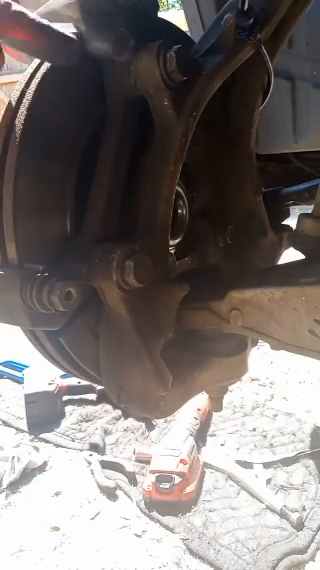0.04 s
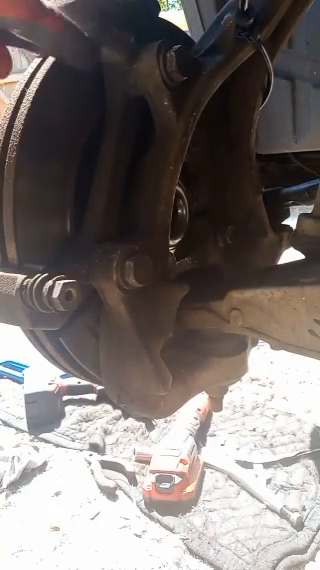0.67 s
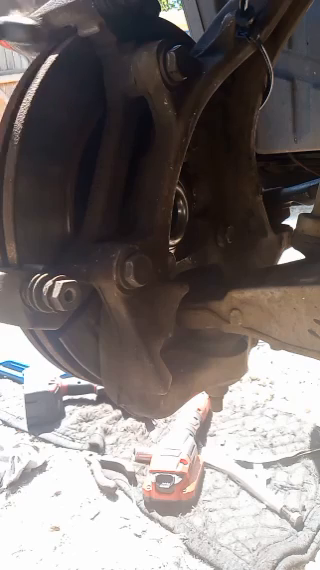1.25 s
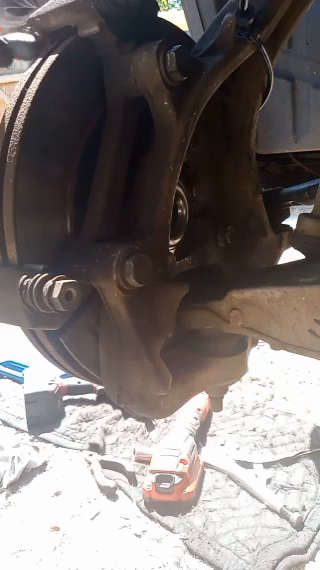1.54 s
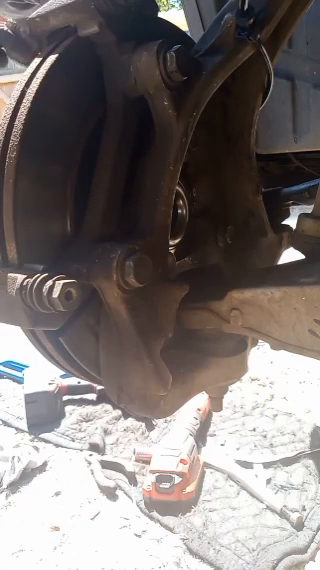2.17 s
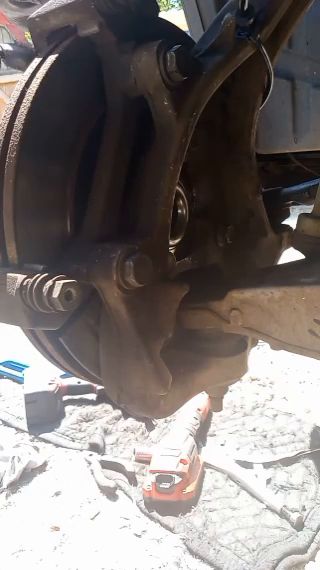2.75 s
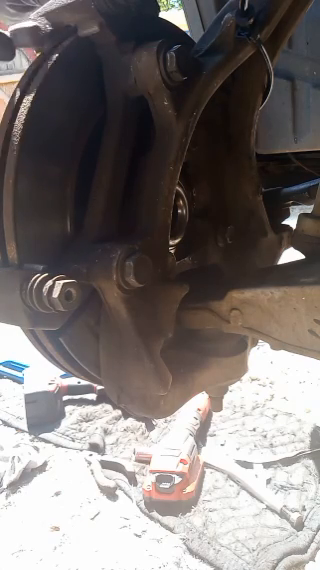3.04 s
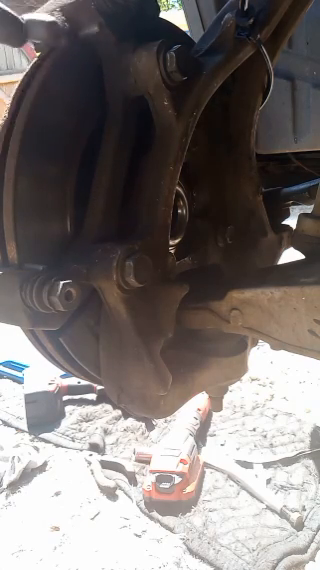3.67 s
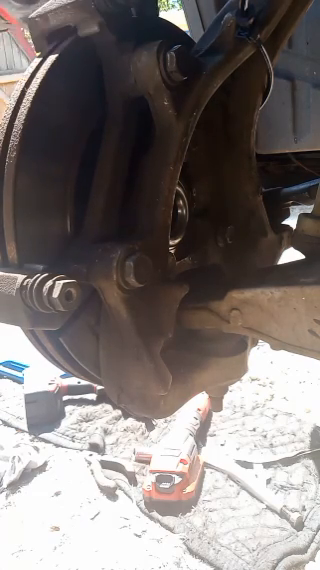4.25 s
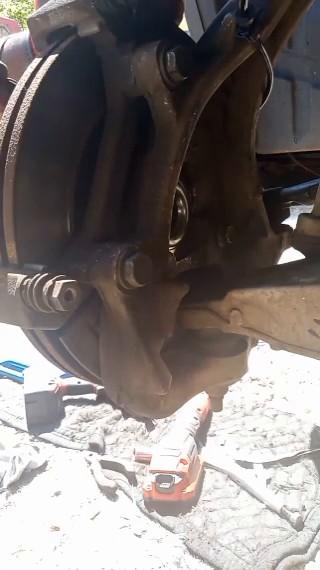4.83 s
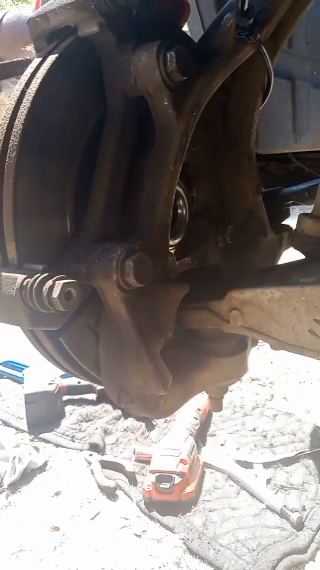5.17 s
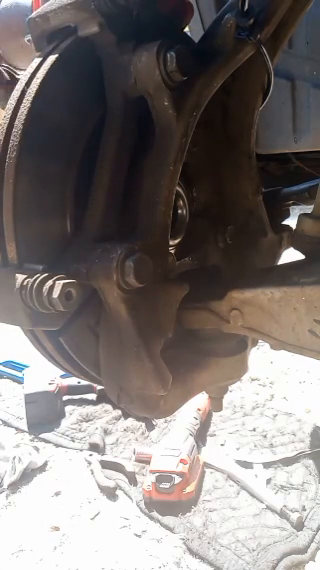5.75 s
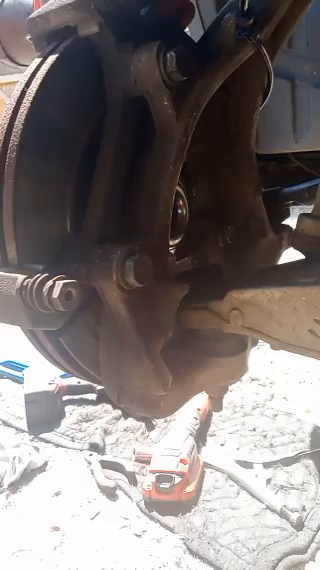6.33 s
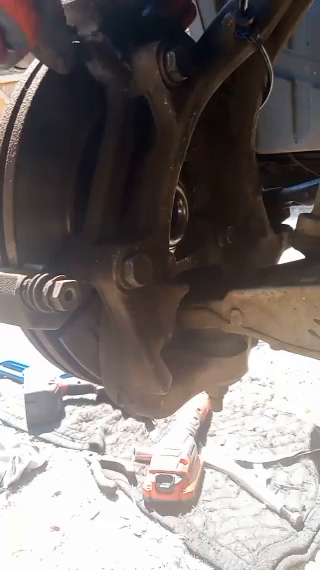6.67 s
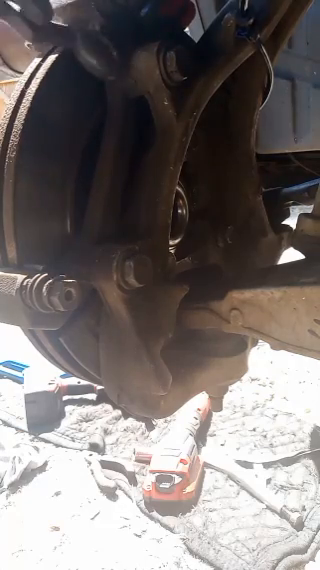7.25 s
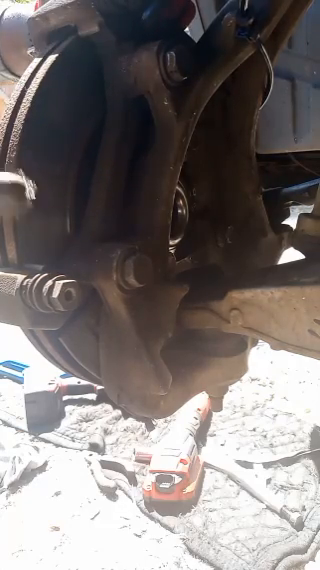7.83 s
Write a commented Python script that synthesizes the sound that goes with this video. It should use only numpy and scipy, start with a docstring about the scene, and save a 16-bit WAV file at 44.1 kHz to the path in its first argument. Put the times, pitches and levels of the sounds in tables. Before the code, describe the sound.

Close by, rapid rasping strokes of a wire brush work over a rusty brake caliper in a car's wheel well. The scrubbing comes in uneven runs with short lulls, the metal ringing slightly and the brush head now and then knocking against it. A low rumble of breeze on the microphone grows from about halfway and is strongest near the end, as the brushing stops.

```python
"""At a car's wheel well, a wire brush scrubs rust off the brake caliper, about eight strokes a second.
Wire tips snap over the rust and ring the casting, whose modes change with the spot being brushed.
Now and then the brush head knocks on the iron, and at first the sheet shield drums along.
The well adds close reflections, and a breeze buffets the two microphone ports over a faint bed of air."""
import sys
import numpy as np
from scipy import signal
from scipy.fft import rfft, irfft, next_fast_len
from scipy.io import wavfile
from scipy.ndimage import map_coordinates

SR = 44100
rng = np.random.default_rng(int(sys.argv[2]) if len(sys.argv) > 2 else 0)


def int16_out(signal):
    """Quantize to a 16-bit WAV file."""
    q = np.round(np.clip(np.atleast_2d(signal).T, -1, 1) * 32767)
    wavfile.write(sys.argv[1], SR, q.astype(np.int16))


N = 356989
T = np.arange(N) / SR
LEFT_LEAD_S = 0.00029  # direct sound reaches the left port first


def scrubbing():
    """The brush's heel rasps on one spot while its tip travels; together they ring the iron."""
    pressure = contact() * from_db(1.2 * drift(29.5))  # the hand presses unevenly
    gains = stroke_envelopes() * pressure
    heel = wire_patch(*gains / np.sqrt(2))
    tip = wire_patch(*gains / np.sqrt(2))
    blows = knocks(level_db=1.5)
    moving = tip + tufts() * pressure + twangs(scrape=gains[0])
    rasp = wheel_well(heel, wet_db=9) + travelling_reflections(moving, wet_db=10.5)
    rasp += travelling_reflections(0.93 * blows, wet_db=16.5)
    ring = casting(heel + tip + 0.75 * blows, level_db=-1.5, wander_db=9)
    return rasp, ring


# The scrubbing rhythm, push and pull in turn; grind is the extra growl as the wires dig in.
# full_speed_s, hold_s, level_db, grind_db, hollow_hz, rasp_hz
STROKES = [(0.034, 0.052, -41.5, 3.5, 760, 6800), (0.112, 0.0089, -48, 3, 1400, 4200),
           (0.187, 0.045, -46.5, 2, 2350, 3580), (0.31, 0.014, -42, 2.5, 1680, 2980),
           (0.428, 0.018, -40.5, 7.5, 966, 4800), (0.528, 0.051, -42, -0.5, 1280, 4500),
           (0.644, 0.031, -47.5, 8.5, 1320, 4450), (0.758, 0.0046, -44.5, -1, 740, 5830),
           (0.859, 0.041, -52, 14.5, 1340, 4740), (0.972, 0.003, -43.0, 6, 1060, 2850),
           (1.076, 0.057, -51.5, 7, 950, 4740), (1.194, 0.016, -52, -10, 950, 2940),
           (1.286, 0.071, -43, -4, 2100, 6500), (1.403, 0.028, -61, 7, 970, 3580),
           (1.574, 0.013, -56, -1, 794, 6280), (1.654, 0.004, -58.5, 1, 1310, 6350),
           (1.703, 0.0074, -64.5, -11, 1100, 4170), (1.777, 0.015, -42.5, 1, 790, 6040),
           (1.935, 0.067, -66, -4.5, 1900, 4450), (2.092, 0.022, -64.5, -6, 1070, 4330),
           (2.266, 0.025, -51, 2, 1130, 6200), (2.361, 0.013, -58.5, 4, 1490, 5940),
           (2.401, 0.012, -50.5, 0.5, 1700, 6240), (2.482, 0.0073, -48.5, 5, 1160, 5950),
           (2.6, 0.059, -63.5, 3, 1420, 5290), (2.753, 0.11, -71, 2.5, 2240, 3410),
           (2.875, 0.0045, -63.5, 11, 1360, 4060), (3.061, 0.018, -41.5, 2.5, 2830, 3140),
           (3.161, 0.038, -46, -2, 2780, 3230), (3.284, 0.011, -44.5, 9.5, 2480, 3380),
           (3.345, 0.058, -62.5, 1, 950, 3310), (3.418, 0.0085, -47, -0.5, 950, 4150),
           (3.52, 0.024, -43, -11, 735, 3480), (3.575, 0.036, -48.5, -5, 1500, 4060),
           (3.682, 0.049, -45, -4.5, 1540, 7250), (3.813, 0.035, -40.5, -5, 2440, 5400),
           (3.926, 0.023, -42, -4, 915, 6300), (4.036, 0.035, -41, -6, 1320, 4330),
           (4.142, 0.087, -40, -7, 1190, 3170), (4.885, 0.023, -65.5, 5.5, 1430, 3500),
           (4.921, 0.0054, -61, 3, 1000, 5200), (5.03, 0.021, -49, 2, 2230, 3400),
           (5.122, 0.039, -50.5, -3, 1550, 7300), (5.245, 0.058, -50.5, 2, 2190, 3860),
           (5.336, 0.05, -54.5, 0, 1670, 4700), (5.425, 0.02, -62.5, 6.5, 900, 4200),
           (5.476, 0.014, -47, -1, 1120, 3360), (5.533, 0.0089, -54, -2, 1300, 4200),
           (5.573, 0.017, -39, -2.5, 840, 5140), (5.662, 0.035, -54.5, 1, 1150, 6400),
           (5.788, 0.0085, -40.5, -3.5, 1510, 5550), (5.869, 0.046, -49, 2, 2770, 7050),
           (5.979, 0.013, -45, 0.5, 2780, 3010), (6.049, 0.052, -52, 4, 1150, 5050),
           (6.158, 0.019, -43, 1, 840, 3060), (6.212, 0.025, -56.5, 2, 820, 4170),
           (6.266, 0.036, -45.5, 0.5, 990, 6260), (6.609, 0.027, -64.5, -2, 2420, 4870),
           (6.736, 0.0043, -56.5, -10, 1770, 5950), (6.876, 0.042, -45.5, -1, 990, 4840),
           (6.973, 0.046, -42, 3.5, 1770, 3870), (7.106, 0.024, -43, 5.5, 1020, 5600),
           (7.202, 0.0049, -42, 4.5, 766, 5000), (7.277, 0.026, -46.5, 8.5, 2420, 2930),
           (7.388, 0.013, -44.5, 2.5, 1390, 4940), (7.464, 0.017, -59, 18.5, 730, 3160),
           (7.531, 0.0057, -44.5, 11, 1040, 4050), (7.746, 0.019, -67, 2, 1980, 3130)]
def stroke_envelopes():
    """Overlapping strokes add in power, giving envelopes for scrape, body, bite and sheen."""
    power = np.zeros((4, N))
    for *stroke, hollow_hz, rasp_hz in STROKES:
        span, gains = stroke_gains(*stroke)
        power[:, span] += gains ** 2
    return np.sqrt(power)


def tufts(hollow_db=14, rasp_db=6.5, relative_width=0.075, glide_octaves_per_s=-2.1):
    """Tufts bend anew on each stroke: a hollow resonance that sinks as they drag, and a bright rasp."""
    grit, out = rng.standard_normal((2, N)), np.zeros(N)
    for s, hold, db, grind_db, hollow_hz, rasp_hz in STROKES:
        span, (scrape, body, bite, sheen) = stroke_gains(s, hold, db, grind_db)
        speed = 2 ** (glide_octaves_per_s * (T[span] - s - hold / 2))
        hollow = resonance(grit[0, span], hollow_hz, relative_width * hollow_hz)
        sinking = map_coordinates(hollow, [np.cumsum(speed)], order=1, mode="mirror")
        rasp = resonance(grit[1, span], rasp_hz, relative_width * rasp_hz)
        out[span] += from_db(hollow_db) * bite * sinking + from_db(rasp_db) * scrape * rasp
    return out


# The mix of a usual stroke on the rim, flank, face, top and edge.
# scrape_db, body_db, bite_db, sheen_db
SPOT_MIXES = [(-44, -56.5, -56.5, -46), (-49, -55.5, -62, -51), (-43.5, -51, -50.5, -46),
              (-45.5, -46.5, -54, -48), (-45, -58, -57.5, -46.5)]
def stroke_gains(s, hold, db, grind_db, usual_db=-45, swell_db_per_s=538, fade_db_per_s=580):
    """A stroke speeds up, holds and slows to the turn; effort, grind and spot set its four layers."""
    follows = np.array([[1], [0.67], [0.81], [0.97]])  # body and bite last through light strokes
    grind_share = np.array([[0], [0.76], [0.73], [0]])
    span = slice(max(int((s - .13) * SR), 0), int((s + hold + .13) * SR))
    swell_db = (s - T[span]) * swell_db_per_s
    fade_db = (T[span] - s - hold) * fade_db_per_s
    effort_db = db - usual_db - np.maximum(0, np.maximum(swell_db, fade_db))
    mix_db = np.array(SPOT_MIXES[spot_at(s)])[:, None]
    return span, from_db(follows * effort_db + grind_share * grind_db + mix_db)


# The brush's path over the rim, flank, face, top and edge.
# start_s, end_s
SPOT_TIMES = [(0, 2.15), (2.15, 3.48), (3.48, 4.5), (4.5, 6.5), (6.5, 9)]
def spot_at(s):
    """Which part of the casting is under the brush at that time."""
    return np.searchsorted([end for start, end in SPOT_TIMES], s)


# Four colours of wire on rust: bright scrape, low body, midrange bite, airy sheen.
# frequency_hz, density_db
SCRAPE_EQ = [(1500, -46), (2300, -24), (2800, -4), (4200, 1.5), (5500, 5), (6400, 0), (7400, -2.5),
             (8000, -14.5), (10000, -29.5)]
BODY_EQ = [(150, 19), (350, 12.5), (520, 11.5), (800, 7), (1300, -0.5), (1900, -23), (3000, -35)]
BITE_EQ = [(800, -29), (1400, -4.5), (1800, -5.5), (2400, -2), (3000, -10.5), (4500, -72)]
SHEEN_EQ = [(6500, -53), (8000, -7.5), (8600, -2), (9700, 3.5), (12000, 4), (13600, -1.5), (14300, 2),
            (14900, 13.5), (15450, 12.5), (15650, -12)]
# Bright accents where wires catch and spring free.
# start_s, level_db, decay_s
SNAGS = [(0.415, -47, .014), (0.645, -50, 0.0083), (0.846, -49, 0.014), (0.976, -33.5, 0.0087),
         (2.238, -55, 0.023), (2.278, -44.5, 0.0017), (2.358, -58, 0.0043), (2.475, -42, 0.0039),
         (2.872, -56, 0.0096), (3.023, -52, 0.018), (3.677, -41, 0.023), (4.513, -82, 0.011),
         (5.297, -46, .006), (5.565, -45, 0.0084), (6.44, -76, 0.0073), (6.711, -63, 0.011),
         (6.735, -59, .008), (6.849, -50.5, 0.016), (7.197, -38.5, 0.0099), (7.352, -50, 0.0058),
         (7.527, -41, 0.011), (7.865, -66.5, 0.0095)]
def wire_patch(scrape, body, bite, sheen):
    """The force of one patch of wires on the rust: a stream of snaps in four colours."""
    snaps = wire_tips(per_s=12000, spread_db=2.2, clump_db=2.1)
    snags = bursts(SNAGS)
    layers = [(SCRAPE_EQ, np.hypot(scrape, snags), -2.2), (BODY_EQ, body, -8),
              (BITE_EQ, bite, -3.8), (SHEEN_EQ, np.hypot(sheen, 1.02 * snags), -.8)]
    return sum(from_db(db) * gain * rms_one(coloured(snaps, eq)) for eq, gain, db in layers)


def wire_tips(per_s, spread_db, clump_db):
    """Tiny snaps of uneven size, bunched as tufts of wire slip together."""
    fires = rng.random(N) < per_s / SR
    sizes = from_db(spread_db * np.minimum(rng.exponential(1, N), 4)) * rng.choice([-1, 1], N)
    return rms_one(fires * sizes * from_db(clump_db * drift(24.5)))


def twangs(scrape, per_s=130, low_hz=1700, high_hz=7500, decay_s=.005):
    """Single wires catch and twang, each at its own pitch, the harder the faster the stroke."""
    out, age = np.zeros(N), T[:SR // 30]
    for when, pitch, size in rng.random((int(per_s * N / SR), 3)):
        at = int(when * (N - len(age)))
        hz = low_hz + (high_hz - low_hz) * pitch
        gain = scrape[at] * from_db(-7.5 + 8 * size)
        out[at:at + len(age)] += gain * np.exp(-age / decay_s) * np.sin(2 * np.pi * hz * age)
    return out


# The brush lifts at the end of a run and plucks the iron as it goes.
# start_s, pluck_db, favoured_hz, boost_db, breadth_octaves, contact_left_ratio
LIFTS = [(1.375, -68, 2900, 24, .7, .8), (1.803, -65, 4160, 24, .1, .12), (2.895, -85, 4160, 6, .1, .12),
         (4.24, -51, 541, 2, .1, .12), (6.325, -68, 4160, 9, .1, .12), (7.564, -58, 3000, 5, .7, .12)]
def contact():
    """1 while the wires touch; they lift within milliseconds and come back gently."""
    dips = [np.interp(T, [s, s + .012, s + .07, s + .11], [1, remaining, remaining, 1])
            for s, *pluck, remaining in LIFTS]
    return np.prod(dips, axis=0)


# The iron's voice: each mode, how it answers at each spot or to a pluck, and where it sits in stereo.
# pitch_hz, width_hz, rim_db, flank_db, face_db, top_db, edge_db, pluck_db, pan_left_db, left_lead_rad
CASTING_MODES = [(541, 10, 8, 8, 9, 14, 4, 0, 3, .6), (682, 22, 10, 8, 12, 14, 6, -25, 4, -.6),
                 (735, 30, 10, 19, 12, 9, 6, -25, 1, -1.4), (820, 22, 2, 5, 4, 9, 5, -25, -1, 1.3),
                 (950, 24, 10, 5, 8, 9, 5, -14, -4, 1.2), (1000, 26, 7, 10, 7, 6, 8, -25, -4, .6),
                 (1140, 28, 2, 2, 5, 7, 2, -25, 2, 1), (1365, 22, 0, -3, 0, 2, 2, -22, 7, 2.6),
                 (1665, 34, 4, 6, 2, 1, 4, -22, 9, 1), (2030, 34, -7, -4, -4, 1, 2, -30, 2, 1.2),
                 (2230, 11, 3, 4, 0, 0, 11, -6, -4, 1.6), (2315, 20, 5, 3, 7, 1, 7, -20, 9, 1.2),
                 (2495, 34, -2, 1, -3, -3, 3, -30, -1, .7), (2590, 54, -2, -3, -2, 2, 1, -30, 8, .9),
                 (3160, 54, -6, 1, -4, -2, -8, -30, 4, -.9), (3675, 8, -3, -3, -5, -5, -3, -17, 2, 1.4),
                 (4160, 20, 7, 9, 7, 6, 5, -13, 0, -.6), (4452, 32, 1, 3, 2, 0, 0, -26, 3, 1.1),
                 (4215, 39, 0, 1, 0, 2, 0, -28, 0, 0), (4725, 34, -4, -4, -4, -1, -2, -30, 5, 0),
                 (5143, 34, -4, -1, -4, 3, -4, -30, -4, -.6), (5300, 11, -8, -8, -8, -7, -8, -21, 0, .4),
                 (7015, 15, -5, -4, -6, -8, -5, -15, 4, -.6), (10549, 22, 1, 2, 2, 1, 0, -13, 2, 1.4),
                 (6155, 49, -2, 2, -3, 6, 1, -30, -1, .6), (6290, 94, -1, 8, 1, 9, -2, -18, -3, 0),
                 (7150, 64, 0, 0, -4, -5, -4, -30, 0, 0), (7500, 84, -6, 0, -2, 2, -3, -30, 0, 0)]
def casting(force, level_db, wander_db):
    """The point of contact decides how strongly each mode answers; a lift plucks it and lets it ring."""
    spot, out = spot_at(T), np.zeros((2, N))
    for hz, width, *spot_db, pluck_db, pan_db, lead_rad in CASTING_MODES:
        wander = from_db(level_db + wander_db * np.tanh(drift(10.1)))
        drive = force * wander * from_db(spot_db)[spot]
        for s, db, favoured_hz, boost_db, breadth, _ in LIFTS:
            favour_db = boost_db * np.exp(-(np.log2(hz / favoured_hz) / breadth) ** 2)
            drive[round(s * SR)] += from_db(db + pluck_db + favour_db) * SR / (2 * np.pi * width)
        ring = resonance(drive, hz, width)
        right_delay = round(lead_rad * SR / (2 * np.pi * hz))
        out[0] += from_db(pan_db / 2) * ring
        out[1] += from_db(-pan_db / 2) * np.roll(ring, right_delay)
    return out


# Hits of the brush head, each with a thud for the shield.
# start_s, level_db, centre_hz, breadth_ratio, decay_s, shield_thud_db
KNOCKS = [(0.734, -41.5, 583, 0.83, 0.018, -38.5), (0.955, -45.5, 610, 0.18, 0.031, -37.5),
          (1.433, -51, 970, 0.26, 0.0074, -68), (3.528, -61.5, 594, 0.2, 0.035, -99),
          (4.238, -62.5, 546, 0.13, 0.043, -81), (4.614, -57.5, 1520, 0.18, 0.0092, -85),
          (4.815, -58.5, 760, 0.41, 0.032, -61), (4.895, -56.5, 890, 0.93, 0.024, -74),
          (5.157, -36, 940, 1, 0.014, -54.5), (5.792, -47, 930, 1, 0.03, -65),
          (5.814, -51, 616, 0.31, 0.024, -56), (6.189, -55, 900, 0.22, 0.028, -73),
          (6.638, -51, 1850, 0.46, 0.0041, -81), (1.67, -69, 594, 0.24, .025, -67),
          (2.415, -64, 1500, 0.34, 0.0066, -68), (4.511, -64.5, 1600, 0.53, .005, -79),
          (6.878, -47.5, 1560, 0.75, 0.015, -80), (7.464, -56, 1460, 0.55, .008, -78),
          (7.116, -43, 1590, 0.9, 0.024, -65), (7.13, -58, 990, 1, 0.017, -70),
          (7.277, -48, 2250, 0.24, 0.024, -59.5), (7.537, -52, 615, 0.21, 0.033, -49)]
def knocks(level_db):
    """The brush head lands with a short, dull crunch."""
    out, age = np.zeros(N), T[:SR // 4]
    for s, db, hz, breadth, decay, _ in KNOCKS:
        band = signal.butter(3, [hz / (1 + breadth), hz * (1 + breadth)], "band", fs=SR, output="sos")
        noise = signal.sosfilt(band, rng.standard_normal(2 * len(age)))
        crunch = rms_one(noise[len(age):]) * np.exp(-age / decay)
        at = round(s * SR)
        out[at:at + len(age)] += from_db(db + level_db) * crunch
    return out


# Small clinks of metal on metal.
# start_s, level_db, pitch_hz, t60_s
CLINKS = [(1.434, -55, 990, 0.074), (4.615, -59, 1440, .07), (4.818, -68, 940, .07),
          (6.641, -61, 1260, .035)]
# The timbre of a clink.
# pitch_ratio, level_db
CLINK_PARTIALS = [(1, -3), (1.67, -11), (2.25, -13)]
def clinks():
    """A light touch of metal rings briefly on a few partials."""
    out, age = np.zeros(N), T[:SR // 4]
    for s, db, hz, t60 in CLINKS:
        at = round(s * SR)
        for ratio, partial_db in CLINK_PARTIALS:
            envelope = from_db(db + partial_db - 60 * age / t60)
            out[at:at + len(age)] += envelope * np.sin(2 * np.pi * hz * ratio * age)
    return at_ports(out)


# The low modes of the sheet shield.
# pitch_hz, width_hz, level_db
SHIELD_MODES = [(149.3, 11.4, 2), (175.4, 7.9, -5.5), (264, 44, -9), (351.7, 10.4, -10), (384, 16, -12),
                (419, 3.1, -15)]
# How hard the brushing drums on it.
# time_s, level_db
DRUMMING = [(0, -90), (0.12, -61), (0.45, -59), (0.7, -65.5), (0.8, -52.5), (1.0, -54.5), (1.18, -55),
            (1.32, -92), (1.5, -74.5), (2.0, -79.5), (8.1, -78.5)]
def shield(thud_decay_s):
    """Thin sheet metal drums under the brush and booms at the harder knocks."""
    thuds = bursts([(s, thud_db + 5.5, thud_decay_s) for s, *_, thud_db in KNOCKS])
    force = (from_db(curve(DRUMMING)) + thuds) * rng.standard_normal(N)
    return sum(from_db(db - 1) * np.sqrt(SR / (np.pi * width)) * resonance(force, hz, width)
               for hz, width, db in SHIELD_MODES)


# The rustle that fills the gaps between strokes.
# time_s, level_db
CREEP = [(0, -64.5), (1.5, -67), (2.15, -99), (2.6, -65.5), (2.95, -102), (3.5, -56.5), (4.35, -77.5),
         (4.8, -75), (6.4, -84), (8.1, -82.5)]
def resting_wires():
    """Even at rest the wires creep over the rust with a soft rustle."""
    ticks = wire_tips(per_s=5000, spread_db=3, clump_db=2) * from_db(2 * drift(12))
    rustle = rms_one(coloured(ticks, SCRAPE_EQ) + .5 * coloured(ticks, SHEEN_EQ))
    return from_db(curve(CREEP)) * wheel_well(rustle, wet_db=2)


def wheel_well(x, wet_db, t60_s=0.022, low_cut_hz=900):
    """Close walls add a short, dense tail to the direct sound, weaker in the bass."""
    age = T[:SR // 25]
    tails = rng.standard_normal((2, len(age))) * from_db(-60 * age / t60_s) * (age > .001)
    tails /= np.sqrt(np.sum(tails ** 2, axis=1, keepdims=True))
    tails = signal.lfilter(*signal.butter(1, low_cut_hz, "high", fs=SR), tails)
    wet = signal.oaconvolve(x[None], tails, axes=1)[:, :len(x)]
    return (at_ports(x) + from_db(wet_db) * wet) / np.hypot(1, from_db(wet_db))


def travelling_reflections(x, wet_db, renew_s=.06):
    """The moving brush keeps meeting new reflections, so their colour shifts from stroke to stroke."""
    hop, out = int(renew_s * SR), np.zeros((2, N))
    window = np.sin(np.pi * np.arange(2 * hop) / (2 * hop))
    for at in range(0, N - hop, hop):
        piece = x[at:at + 2 * hop]
        out[:, at:at + 2 * hop] += wheel_well(piece * window[:len(piece)], wet_db)
    return out


# The rise and fall of the breeze.
# time_s, left_db, right_db
BREEZE = [(0, -61, -66), (1.1, -74, -60), (1.45, -76.5, -75), (2.4, -64, -85), (3.0, -73.5, -68),
          (3.75, -69.5, -70), (4.35, -72, -60.5), (4.55, -60.5, -53.5), (4.95, -74, -57.5),
          (5.25, -62, -52), (5.5, -59, -46), (5.8, -54, -50.5), (6.0, -65, -54), (6.35, -55, -47),
          (6.6, -58, -56.5), (7.1, -87, -62), (7.45, -61, -52.5), (7.65, -41, -41.5), (7.8, -61, -30.5),
          (7.9, -58.5, -60), (8.05, -45.5, -56.5)]
def breeze(level_db, gusty_db, low_cut_hz=48):
    """Each microphone port catches its own gusts and buffets."""
    strengths_db = [level_db + curve(BREEZE, column) + gusty_db * np.tanh(drift(4.9))
                    for column in (1, 2)]
    wind = np.array([gust(db) for db in strengths_db]) + buffets()
    return signal.sosfilt(signal.butter(2, low_cut_hz, "high", fs=SR, output="sos"), wind)


# Wind colours: the deep rumble, and the rush on top of a strong gust.
# frequency_hz, density_db
RUMBLE_EQ = [(20, -20), (40, -5), (62, 8), (100, 8), (160, -2.5), (230, -11), (330, -48), (500, -47),
             (1000, -88)]
RUSH_EQ = [(120, -5), (230, 14.5), (320, -10), (420, -0.5), (560, -15), (900, -85)]
def gust(level_db, lumpy_db=7.5, rush_db=-9, strong_db=-26):
    """Lumpy rumble on one port; the stronger the wind, the higher its eddies reach."""
    eddies = rng.standard_normal(N) * from_db(lumpy_db * drift(23.2))
    rumble = rms_one(coloured(eddies, RUMBLE_EQ))
    rush = from_db(rush_db + 0.94 * (level_db - strong_db)) * rms_one(coloured(eddies, RUSH_EQ))
    return from_db(level_db) * (rumble + rush)


# The hardest bumps of wind.
# peak_s, level_db, port (0 left, 1 right)
BUFFETS = [(1.519, -44.5, 1), (2.253, -43, 0), (2.431, -39.5, 1), (4.01, -42.5, 1), (4.551, -36, 1),
           (4.775, -29.5, 1), (5.073, -30, 1), (5.38, -29, 1), (5.396, -31, 1), (5.416, -26.5, 1),
           (5.462, -31, 1), (5.509, -39, 0), (5.717, -29.5, 1), (5.761, -33, 0), (5.843, -31, 1),
           (6.01, -28.5, 1), (6.106, -30.5, 1), (6.264, -27.5, 1), (6.292, -31, 1), (6.413, -29.5, 1),
           (6.582, -35.5, 1), (6.77, -36.5, 1), (6.956, -34.5, 1), (7.25, -33.5, 1), (7.412, -36.5, 1),
           (7.589, -28, 1), (7.631, -25.5, 1), (7.67, -28, 1), (7.755, -25.5, 1), (7.831, -27.5, 1)]
def buffets(usual_db=-30, usual_hz=135, lowest_hz=92, octaves_per_db=0.33, flutter_hz=248):
    """An eddy hits a port with one swing of pressure and a quick flutter; faster eddies swing higher."""
    out = np.zeros((2, N))
    for s, db, port in BUFFETS:
        harder_db = db - usual_db
        swing_hz = max(usual_hz * 2 ** (octaves_per_db * harder_db), lowest_hz)
        span = slice(int((s - .04) * SR), int((s + .04) * SR))
        for hz, part_db in [(swing_hz, 2.5), (flutter_hz, -10 + 0.4 * harder_db)]:
            cycles = (T[span] - s) * hz
            wave = np.cos(2 * np.pi * (cycles + rng.random()))
            out[port, span] += from_db(db + part_db) * wave / np.cosh(rng.uniform(1.4, 2.8) * cycles)
    return out


# The colour of the background air.
# frequency_hz, density_db
AIR_EQ = [(30, 2), (80, -6), (200, -7.5), (500, -5), (1200, -12.5), (3000, -17.5), (6000, -26), (8500, -31),
          (13000, -28), (15300, -22), (15800, -84)]
def air(level_db):
    """A faint, steady, wide hush under everything."""
    return from_db(level_db) * rms_one(coloured(rng.standard_normal((2, N)), AIR_EQ))


def from_db(db):
    """Decibels to gain."""
    return 10 ** (np.asarray(db) / 20)


def rms_one(x):
    """Scale to unit power."""
    return x / np.sqrt(np.mean(x ** 2) + 1e-20)


def curve(rows, column=1):
    """One column of a table, joined by straight lines in time."""
    rows = np.array(rows)
    return np.interp(T, rows[:, 0], rows[:, column])


def coloured(x, eq, share=1):
    """Filter by an EQ curve, or by a share of its decibels."""
    hz, db = np.transpose(eq)
    size = next_fast_len(N + 4096)
    bin_hz = np.maximum(np.arange(size // 2 + 1) * SR / size, 1)
    gain = from_db(share * np.interp(np.log(bin_hz), np.log(hz), db))
    return irfft(rfft(x, size) * gain, size)[..., :N]


def drift(rate_hz, step=40):
    """Slow random modulation with a spread of 1."""
    r = np.exp(-2 * np.pi * rate_hz * step / SR)
    slow = signal.lfilter([1], [1, -2 * r, r * r], rng.standard_normal(N // step + 2002))[2000:]
    return np.interp(np.arange(N) / step, np.arange(len(slow)), rms_one(slow))


def resonance(x, hz, width_hz):
    """A two-pole resonance with gain 1 at its peak."""
    r = np.exp(-np.pi * width_hz / SR)
    feedback = [1, -2 * r * np.cos(2 * np.pi * hz / SR), r * r]
    return signal.lfilter(np.array([1, 0, -1]) * (1 - r * r) / 2, feedback, x + 1e-18)


def bursts(rows, rise_s=.003):
    """An envelope of quick attacks that die away, from rows of start_s, level_db, decay_s."""
    out = np.zeros(N)
    for s, db, decay in rows:
        at = round(s * SR)
        age = T[:min(N - at, SR // 4)]
        attack = np.minimum(age / min(rise_s, decay / 2), 1)
        out[at:at + len(age)] += from_db(db) * attack * np.exp(-age / decay)
    return out


def at_ports(x):
    """Mono to stereo, with the right side slightly late."""
    return np.array([x, np.roll(x, round(LEFT_LEAD_S * SR))])


# How the brush noise leans between the ports across the spectrum.
# frequency_hz, left_over_right_db
BALANCE_EQ = [(200, 0.5), (520, 11.5), (700, 20), (950, -8), (1600, 8), (2100, 3), (3200, 2), (3900, 5.5),
              (4500, -2.5), (5200, 3.5), (6000, -1), (6500, 2), (11500, 2), (14000, 6.5)]
def scene():
    """Brush and ringing metal up front, wind and air behind."""
    drum = shield(thud_decay_s=0.018) * from_db([[1.5], [-.5]])  # a little to the left
    background = air(level_db=-74.5) + breeze(level_db=7.5, gusty_db=-5)
    rasp, ring = scrubbing()
    brush = coloured(rasp + resting_wires(), BALANCE_EQ, share=np.array([[.5], [-.5]]))
    return brush + ring + clinks() + drum + background


def record(dry):
    """A steep high cut at 15.8 kHz."""
    return signal.sosfilt(signal.ellip(12, .1, 80, 15800, fs=SR, output="sos"), dry)


dry = scene()
out = record(dry)
int16_out(out)
```